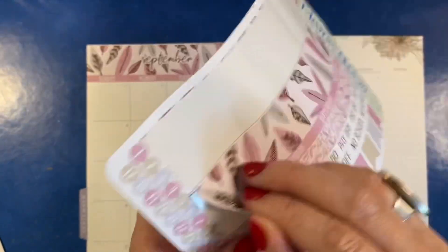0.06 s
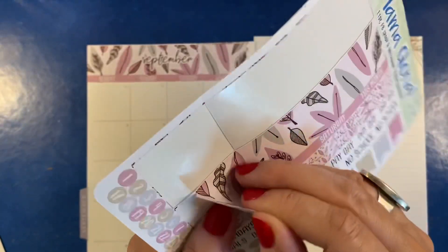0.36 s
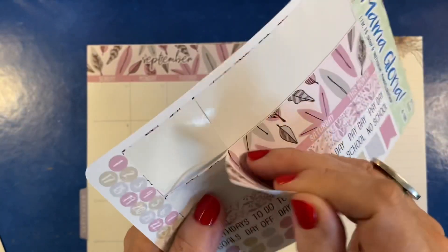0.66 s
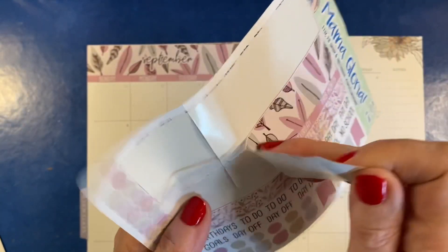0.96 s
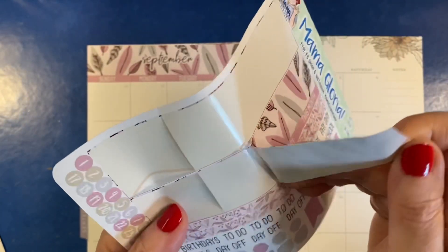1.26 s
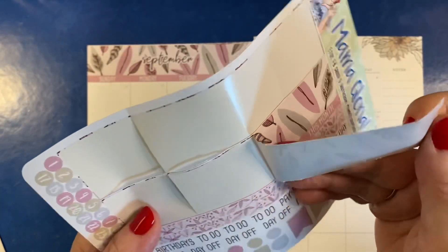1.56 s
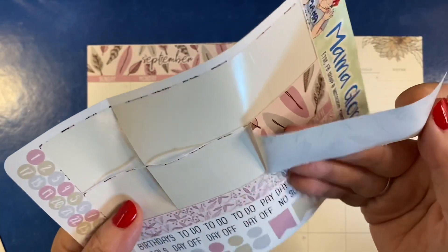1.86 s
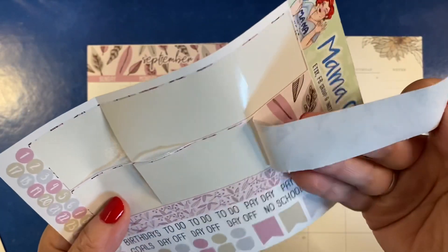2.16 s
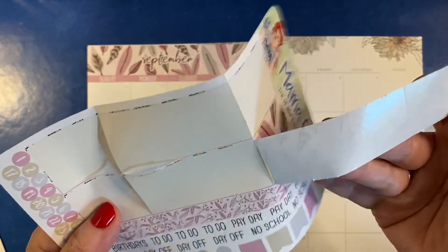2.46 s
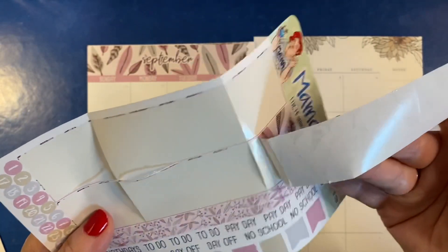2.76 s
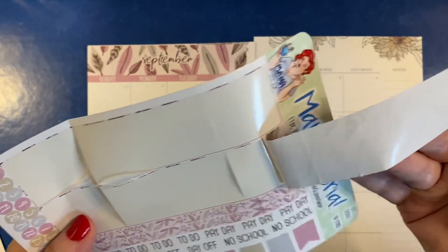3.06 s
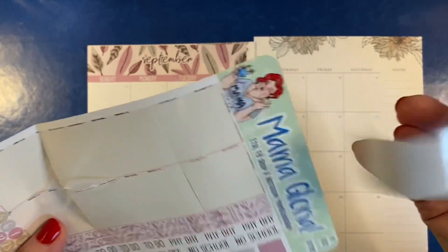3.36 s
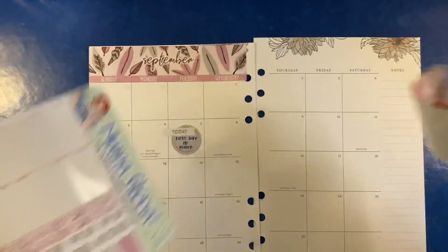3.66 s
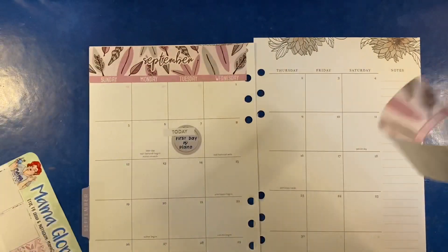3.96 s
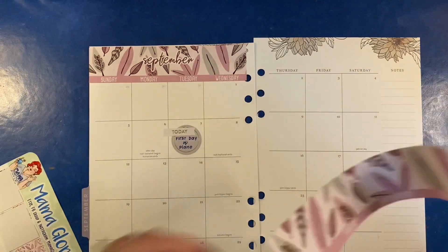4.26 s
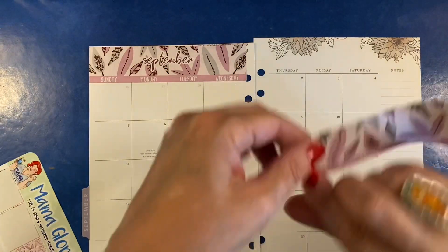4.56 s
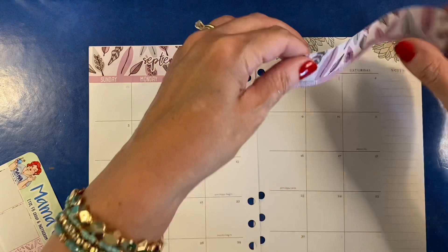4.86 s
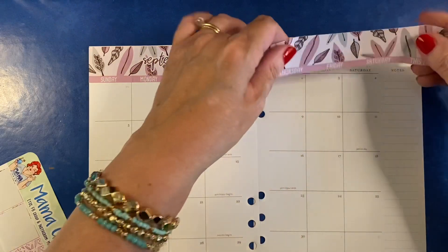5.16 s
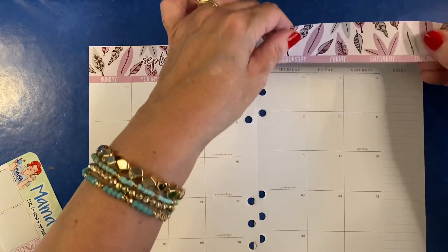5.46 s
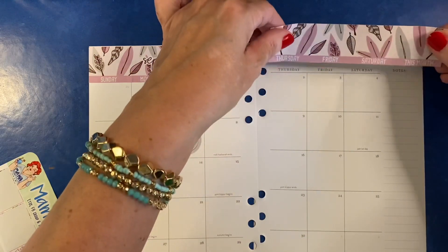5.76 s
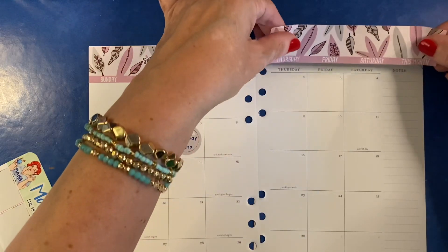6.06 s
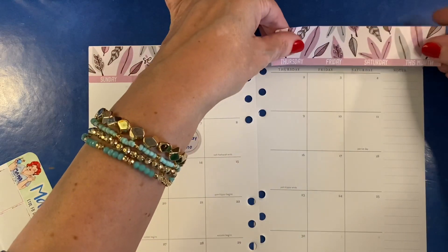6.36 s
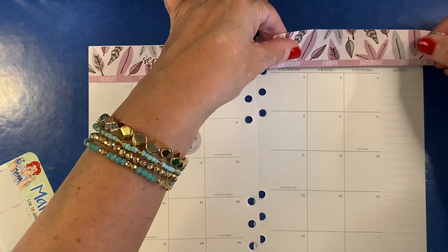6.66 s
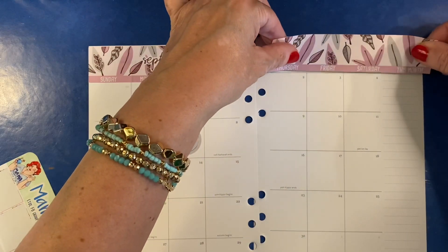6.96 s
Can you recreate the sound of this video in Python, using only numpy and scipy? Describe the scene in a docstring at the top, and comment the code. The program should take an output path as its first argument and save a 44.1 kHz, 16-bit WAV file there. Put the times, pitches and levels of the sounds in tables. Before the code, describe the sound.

Close, crackly peeling and buckling paper give way to a sliding hiss, light ticks and one click over a low room hum.

```python
"""A long sticker is peeled off its glossy backing sheet, close to a two-port microphone.
Threads of glue break in a crackle, and the sheet buckles with snaps and soft thumps.
The sheet slides away with a hiss; fingers stretch the strip over a planner page and tack it down
with a few ticks and one sharp click. A low hum fills the small room, and near the end something
knocks softly on the desk."""
import sys
import numpy as np
from scipy import signal
from scipy.fft import rfft, irfft
from scipy.io import wavfile
from scipy.ndimage import uniform_filter1d

SR = 44100
rng = np.random.default_rng(int(sys.argv[2]) if len(sys.argv) > 2 else 0)


def wav_out(sig):
    """Save sig, one row per channel (or a flat mono array), as 16-bit PCM at SR to the path in sys.argv[1]."""
    wavfile.write(sys.argv[1], SR, np.round(np.clip(np.atleast_2d(sig).T, -1, 1) * 32767).astype(np.int16))


N = 308700  # 7 seconds


def amp(db):
    """Turns decibels into a gain."""
    return 10 ** (np.asarray(db) / 20)


def unit(x):
    """Scales a signal to an average strength (rms) of 1."""
    return x / np.sqrt(np.mean(x ** 2) + 1e-20)


def read(points, hz):
    """Looks up a table by frequency, on a logarithmic axis."""
    f, value = np.transpose(points)
    return np.interp(np.log(hz + 1), np.log(f + 1), value)


def add(mix, s, sound):
    """Adds a sound to the mix at s seconds."""
    part = mix[:, max(round(s * SR), 0):][:, :sound.shape[1]]
    part += sound[:, :part.shape[1]]


def drift(hz):
    """A smooth random wobble, with up to about hz turns a second."""
    f = np.fft.rfftfreq(N, 1 / SR)
    return unit(irfft(rfft(rng.standard_normal(N)) * np.exp(-(f / hz) ** 2), N))


def follow(rows, column):
    """Joins one dB column into a gain over time that fades out beyond both ends."""
    s, db = np.transpose(rows)[[0, column]]
    return amp(np.interp(np.arange(N) / SR, np.r_[s[0] - .04, s, s[-1] + .04], np.r_[-120, db, -120]))


def swells(rows, column, peak_share=.42):
    """Gain over time for hand movements: each speeds up, then eases off."""
    gain = np.zeros((1, N))
    for row in rows:
        start, length = row[:2]
        progress = np.interp(np.linspace(0, 1, int(length * SR)), [0, peak_share, 1], [0, .5, 1])
        add(gain, start, amp(row[column]) * np.sin(np.pi * progress)[None])
    return gain[0]


# where the hands are: t/s, place (1 = left with the sheet, below 0 = right over the page)
HAND_PATH = [(0, 1.2), (.8, 1.1), (2.2, .4), (3.2, .4), (3.6, 1.5), (4.3, -.7), (7, -.6)]
def place(s):
    """How far to the left the hands are at s seconds."""
    return np.interp(s, *np.transpose(HAND_PATH))


# how alike the microphone's two openings (ports) sound: f/Hz, likeness (1 = the same)
PORT_LIKENESS = [(50, 0.87), (300, 0.78), (1000, 0.67), (2500, 0.55), (4500, 0.4), (7000, 0.2),
                 (9000, 0.94), (16000, 1)]
# how much earlier the right port hears: f/Hz, lead/s
RIGHT_LEAD = [(500, -.00004), (3500, -.00003), (5000, .00001), (7000, .00005), (8200, .000178),
              (16000, .000186)]
# the left port's head start for a sound at place 1: f/Hz, phase/rad
LEFT_LEAD = [(100, .1), (450, .3), (1000, .5), (2000, .8), (3500, 1), (5500, 0)]
PAN_DB = 1.6  # left minus right at place 1
def ports(pair, colour=None, left=0):
    """Two sounds become left and right: partly alike, earlier and louder on the nearer side."""
    size = pair.shape[1]
    hz, (a, b) = np.fft.rfftfreq(size, 1 / SR), rfft(pair)
    same = np.clip(read(PORT_LIKENESS, hz), 0, 1)
    shared, apart = a * np.sqrt((1 + same) / 2), b * np.sqrt((1 - same) / 2)
    phase = np.pi * hz * read(RIGHT_LEAD, hz) - left * read(LEFT_LEAD, hz) / 2
    turn = np.exp(1j * phase) * amp(-left * PAN_DB / 2)
    spectrum = np.array([(shared + apart) / turn, (shared - apart) * turn])
    return irfft(spectrum * (1 if colour is None else amp(read(colour, hz))), size)


# the tones of the hum: f/Hz, level/dB, wander/Hz
HUM_TONES = [(59.02, -52.5, 1.213), (127, -67.5, 3)]
# the colour (how strong each frequency is) of the room's noise: f/Hz, level/dB
AIR_COLOUR = [(20, -21), (35, -9.5), (55, 4), (85, 0), (130, -2.5), (200, -7.5), (300, -17.5), (500, -25.5),
              (1000, -34.5), (3000, -51), (7000, -55.5), (16000, -53.5)]
def room_tone(air_db=-59):
    """A wavering low hum in soft, dull noise."""
    hum = 0
    for hz, db, wander in HUM_TONES:
        tone = np.sin(2 * np.pi * np.cumsum(hz + wander * drift(6)) / SR)
        hum += amp(db) * unit(tone * (1 + .049 * drift(7.6)))
    air = unit(ports(rng.standard_normal((2, N)), AIR_COLOUR))
    return hum * amp([[-.6], [.6]]) + amp(air_db) * air


def crackle(per_s, spread_db, life_s, smooth):
    """Tiny bursts of uneven size over a smooth hiss."""
    sizes = amp(spread_db * np.minimum(rng.exponential(1, N), 4))
    clicks = sizes * (rng.random(N) < per_s / SR)
    power = signal.lfilter([1], [1, -np.exp(-2 / (life_s * SR))], clicks ** 2)
    return np.sqrt(power / power.mean() + smooth) * rng.standard_normal((2, N))


def flex(pair, depth_db=3, size=512):
    """As the sheet bends, its resonances wander and colour the sound in passing patches."""
    spectra = signal.stft(pair, nperseg=size)[2]
    patches = uniform_filter1d(rng.standard_normal(spectra.shape[1:]), size=5, axis=0)
    patches = unit(uniform_filter1d(patches, size=9, axis=1))
    return signal.istft(spectra * amp(depth_db * patches), nperseg=size)[1][:, :N]


# the steady pull on the sticker: t/s, glue level/dB, sheet level/dB
STEADY_PULL = [(0, -62, -55.5), (.4, -64, -58), (.62, -60, -57), (.95, -60, -62), (1.08, -61.5, -67),
               (1.35, -59, -63), (1.45, -62.5, -66.5), (2.05, -62, -68), (2.23, -75, -69), (2.35, -66, -61),
               (2.48, -65, -71), (2.75, -64, -63), (3.1, -64, -69), (3.3, -76, -73)]
# tugs, in which it comes away faster: t/s, length/s, level/dB
QUICK_TUGS = [(.48, .1, -59), (.84, .1, -57), (1.12, .16, -51), (1.55, .09, -58), (1.72, .14, -57),
              (2.04, .1, -56), (2.81, .19, -54), (3.14, .08, -57)]
# colours of the breaking glue and the shaken sheet: f/Hz, level/dB
GLUE_COLOUR = [(800, -21), (2500, -10), (3500, 3), (4200, -4.5), (5200, 2), (6400, 0.5), (8500, 7),
               (12000, 3.5), (15500, 0.5), (17000, -8)]
SHEET_COLOUR = [(100, 9), (250, 1), (700, 8.5), (1200, -6.5), (2000, 3), (3500, -4), (6000, -14.5),
                (12000, -16)]
def peel(glue_trim_db=1, sheet_trim_db=-1, tug_shake_db=-4):
    """Threads of glue break in quick clumps and shake the backing sheet; tugs add to the pull."""
    breaks = flex(crackle(per_s=620, spread_db=4.4, life_s=.0006, smooth=.3) * amp(2.3 * drift(45)))
    tugs = swells(QUICK_TUGS, 2)
    pull = follow(STEADY_PULL, 1) + tugs
    shake = follow(STEADY_PULL, 2) + tugs * amp(tug_shake_db)
    glue = unit(ports(breaks, GLUE_COLOUR, left=.6)) * pull * amp(glue_trim_db)
    sheet = unit(ports(breaks, SHEET_COLOUR, left=.6)) * shake * amp(sheet_trim_db)
    return glue + sheet + ticks(pull, 0, STEADY_PULL[-1][0])


def ticks(effort, start, end, per_s=9, offset_db=-.5, spread_db=3):
    """Now and then a thread of glue or a fibre snaps, louder the harder the pull or rub."""
    out, draws = np.zeros((2, N)), rng.random((100, 2))
    for when, strength in draws[:int(per_s * (end - start))]:
        s = start + when * (end - start)
        level_db = 20 * np.log10(effort[int(s * SR)] + 1e-9) + offset_db + spread_db * (2 * strength - 1)
        add(out, s, snap(level_db, body_db=-8, crack_db=4, ring=.002, left=place(s)))
    return out


def ripple(hz, depth_db=3.8):
    """A bent sheet favours some frequencies: a gain with random hills and valleys."""
    lag, phase = rng.random((2, 10, 1))
    waves = np.cos(2 * np.pi * (hz * (.2485 + lag) / 1101 + phase))
    return amp(depth_db * unit(waves.sum(0)))


SHEET_HZ, SHEET_DB, PITCH_SCATTER = 720, 5, .13  # the sheet's main ring; bending shifts its pitch
def snap(level_db, body_db, crack_db, ring, left, size=2048, count=14):
    """A kink flips through the sheet: many bands ring at once, and the high ones die first."""
    hz = np.fft.rfftfreq(size, 1 / SR)
    t = np.maximum(np.arange(size) - 32, 0) / SR
    colour = [(120, body_db - 3), (370, body_db + 3.5), (1050, body_db + 5),
              (3300, .3), (9500, crack_db + .8), (16000, crack_db - 6.5)]
    centres = np.geomspace(140, 15000, count)
    bands = np.array([read(np.c_[centres, row], hz) for row in np.eye(count)])
    ring_hz = SHEET_HZ * np.exp(PITCH_SCATTER * rng.standard_normal())
    bump = amp(SHEET_DB * np.exp(-(np.log((hz + 1) / ring_hz) / .16) ** 2))
    uneven = bump * ripple(hz)
    noise = irfft(rfft(rng.standard_normal((2, 1, size))) * np.sqrt(bands) * uneven, size)
    life = ring * .73 * (centres[:, None] / 3000) ** -.45
    rise = 1 - np.exp(-t / (.4 / centres[:, None] + .14 * ring))  # a slow buckle also starts slowly
    flutter = .07 * np.exp(-t / .0094)  # the sheet moves on weakly after the flip
    ringing = noise * rise * (np.exp(-t / life) + flutter)
    energy = (bands * (amp(level_db + read(colour, hz)) * bump) ** 2).sum(1)
    band_gain = np.sqrt(energy / (ringing ** 2).sum(2))
    return ports((ringing * band_gain[..., None]).sum(1), left=left)


# the paper buckles: t/s, level/dB, low boost/dB, high boost/dB, ring/s (scaled for each band)
BUCKLES = [(.0532, -66, 21, -7, .002), (.0875, -55, -3, 9, .005), (.098, -55, -15, 2, .0012),
           (.1038, -50, -8, 5, .002), (.139, -47, 6, -13, .0012), (.1571, -46, 7, -6, .0012),
           (.1738, -52, 3, 10, .002), (.188, -59, -3, 8, .002), (.3044, -36.5, 7, -1.5, .0035),
           (.3099, -44, 10, -9, .0025), (.318, -51, 3, 2, .0047), (.4536, -39, 6.5, 9, .0026),
           (.4841, -37, 2, -4, .0033), (.5448, -52, 2, 2, .0023), (.5818, -37, 2, 0, .002),
           (.6701, -47, -2, 4, .003), (.7186, -28.5, -3.5, -18, .0018), (.7282, -44, 4, -13, .002),
           (.7711, -54, 5, 13, .0014), (.823, -42, -2, 5, .004), (.8319, -45, 10, 4, .0033),
           (.8474, -45, 5, 1, .0016), (.9104, -44.5, 6, 1, .0026), (.984, -45.5, -7, -2, .002),
           (1.139, -48, 6, 5, .006), (1.1609, -48, 2, 7, .004), (1.2626, -55, -14, 2, .003),
           (1.3212, -52, -2, 9, .008), (1.4698, -52, 0, 2, .003), (1.5129, -45.5, -3, 2, .004),
           (1.5632, -53, -13, 1, .0016), (1.6226, -54, -9, 6, .0017), (1.7522, -48, 2, 5, .0045),
           (1.8019, -53, -10, 2, .003), (1.92, -56, -12, 5, .0025), (1.9967, -44.5, -12, 6, .0013),
           (2.099, -49, -5, -3, .0027), (2.1203, -48.5, -7, 2, .0034), (2.1266, -43.5, -1, -2, .0033),
           (2.2, -68, 19, -4, .006), (2.2851, -55, 0, -6, .0046), (2.316, -55, 2, -4, .009),
           (2.3982, -53, -1, 6, .002), (2.5478, -44, -6, -5, .0018), (2.6169, -65, 20, -9, .003),
           (2.6913, -45, -18, -1, .0027), (2.8418, -48, -5, 4, .0065), (2.8522, -43, 0, -5, .0021),
           (2.9164, -52, -6, 1, .003), (2.9285, -53, -1, -2, .006), (2.971, -50, -10, -1, .002),
           (3.0316, -56, -4, 9, .003), (3.1028, -48.5, 0, 0, .0028), (3.1196, -45, -14, -8, .012),
           (3.1325, -44.5, 3, -2, .005), (3.1403, -42, -4, -7, .0027), (3.1843, -46, -2, 3, .006),
           (3.21, -57, 2, 11, .005), (3.2603, -55, -8, -5, .003), (3.402, -55, -4, -5, .004),
           (3.4463, -47, -17, -12, .006), (3.6908, -50, -4, -11, .006), (3.834, -48, -20, -8, .002),
           (4.064, -68, -12, 8, .003), (4.1112, -62, -10, -1, .007), (4.1668, -59, -17, -11, .005),
           (4.215, -58, -10, -4, .015), (4.3302, -59, -15, 3, .011), (4.3902, -58, -3, 6, .01),
           (4.4081, -51, -9, 8, .003), (4.475, -59, -3, -9, .0037), (4.5232, -55, -3, 4, .0034),
           (4.5498, -53, -10, 3, .012), (4.765, -53, -2, 3, .0037), (4.7919, -59, 1, 3, .003),
           (5.0356, -46, -10, 5, .0037), (5.044, -57, 2, 7, .004), (5.3058, -52, -4, 3, .001),
           (5.4272, -41.5, -5, -4, .0036), (5.7417, -50, -11, 1, .0027), (6.2193, -48, -10, 0, .0027),
           (6.5676, -60, -10, 10, .005), (6.5842, -32, -5, 1, .002)]
def buckles(strain_db=-11.5, build_s=.0035, size=1024):
    """Sheet and sticker buckle and snap; fibres fizz briefly as the strain builds before each."""
    out = np.zeros((2, N))
    swell = np.exp(-np.arange(size)[::-1] / (build_s * SR))
    for s, level_db, *shape in BUCKLES:
        add(out, s - .0006, snap(level_db, *shape, place(s)))
        strain = unit(ports(rng.standard_normal((2, size)), FIBRE_COLOUR)) * swell
        add(out, s - size / SR, strain * amp(level_db + strain_db))
    return out


def blow(s, level_db, tones):
    """A struck object rings with a few tones; each drops 60 dB in its fade time."""
    t, out = np.arange(SR // 2) / SR, np.zeros((2, N))
    ring = sum((-1) ** k * amp(db) * np.exp(-np.log(1000) * t / fade_s) * np.sin(2 * np.pi * hz * t)
               for k, (hz, db, fade_s) in enumerate(tones))
    add(out, s, amp(level_db) * np.array([ring, ring]) * (1 - np.exp(-t / .0007)))
    return out


# the sheet's thumps: t/s, level/dB
THUMPS = [(.158, -45), (.309, -35), (.456, -39), (.832, -41), (1.161, -47), (1.513, -42), (1.646, -48),
          (1.752, -44), (2.2, -44), (2.285, -52), (2.617, -47), (2.89, -52), (3.103, -48), (3.135, -47),
          (3.185, -44), (3.21, -51), (5.428, -53)]
# its low tones before bending shifts them: f/Hz, level/dB, fade/s
THUMP_TONES = [(122, -3, .1), (175, -6, .06), (300, 0, .045), (400, -3, .035), (660, -7, .03)]
def thumps():
    """The flexing sheet thumps softly, at a slightly different pitch each time."""
    bends = np.exp(PITCH_SCATTER * rng.standard_normal(len(THUMPS)))
    return sum(blow(s, db, np.array(THUMP_TONES) * [bend, 1, 1]) for (s, db), bend in zip(THUMPS, bends))


# strokes of a paper edge or fingertip: start t/s, end t/s, level/dB, start f/Hz, end f/Hz
EDGE_STROKES = [(2.76, 2.887, -56.5, 3180, 2700), (2.898, 2.946, -54, 1650, 1550),
                (3.252, 3.582, -65, 850, 1300), (3.312, 3.43, -69, 1900, 2300),
                (3.482, 3.722, -56.5, 3030, 4650), (3.78, 3.857, -65, 3000, 3100),
                (3.94, 4.05, -74, 2100, 2100), (4.467, 4.564, -63, 2200, 2900),
                (4.58, 4.615, -57, 2700, 3100), (4.867, 5.018, -59, 5000, 4700),
                (5.2, 5.33, -69, 3400, 3400), (5.477, 5.558, -66, 4400, 4200), (5.6, 5.98, -72, 4250, 4250),
                (6.25, 6.495, -75, 4380, 4220), (6.922, 6.991, -75, 4400, 4600)]
def strokes(width_share=.46):
    """Tiny slips make the free length of paper ring; its pitch glides as the contact moves."""
    out, slips = np.zeros((2, N)), crackle(per_s=700, spread_db=3.5, life_s=.0008, smooth=.6)
    for start, end, db, start_hz, end_hz in EDGE_STROKES:
        drive = slips[:, int(start * SR):int(end * SR)]
        size = drive.shape[1]
        width_hz = width_share * (start_hz + end_hz) / 2
        decay = np.exp(-np.pi * width_hz / SR)
        glide = np.exp(2j * np.pi * np.cumsum(np.linspace(start_hz, end_hz, size)) / SR)
        # shift down, smooth, shift back: this keeps a band around the gliding pitch
        swish = (glide * signal.lfilter([1], np.poly([decay, decay]), drive / glide)).real
        add(out, start, amp(db) * unit(ports(swish, left=place(start))) * np.sqrt(np.hanning(size)))
    return out


# paper rubs on paper or skin: t/s, length/s, hiss level/dB, page level/dB
PAPER_RUBS = [(3.39, .53, -63, -60), (4.2, .08, -67, -73), (4.38, .1, -55, -71), (4.48, .14, -55.5, -64),
              (4.75, .07, -62, -65), (4.87, .22, -57, -66.5), (5.19, .14, -61.5, -72),
              (5.38, .07, -61, -62), (5.48, .09, -63.5, -68), (5.84, .11, -64.5, -72),
              (6.06, .23, -67, -82), (6.52, .1, -65, -78), (6.62, .16, -75, -71)]
# colours of the hissing fibres and of the page: f/Hz, level/dB
FIBRE_COLOUR = [(1000, -23.5), (2800, -5.5), (4500, -3.5), (6500, -2), (8500, 0.5), (11000, -1),
                (15500, -4.5), (17000, -13.5)]
PAGE_COLOUR = [(150, -6.5), (400, -2), (900, -0.5), (1600, -2.5), (2600, -0.5), (4000, -5.5), (6000, -15.5),
               (10000, -35.5)]
def slide(start=3.3, end=6.6, hiss_trim_db=.1, page_trim_db=-3):
    """Fibres catch and slip as paper slides, making a fine, soft hiss."""
    slips = flex(crackle(per_s=1500, spread_db=2.2, life_s=.0007, smooth=.8) * amp(1.7 * drift(35)))
    stir = [(s, -80.5, -79) for s in (start, end)]  # fingers faintly stir the strip between rubs
    effort = swells(PAPER_RUBS, 2) + follow(stir, 1)
    shake = swells(PAPER_RUBS, 3) + follow(stir, 2)
    hiss = unit(ports(slips, FIBRE_COLOUR)) * effort * amp(hiss_trim_db)
    page = unit(ports(slips, PAGE_COLOUR)) * shake * amp(page_trim_db)
    pan_db = PAN_DB * place(np.arange(N) / SR)
    return (hiss + page) * amp([pan_db / 2, -pan_db / 2]) + ticks(effort, start, end)


# the tones of the page: f/Hz, level/dB, fade/s
PAGE_TONES = [(345, -8, 0.07), (995, -1.5, 0.03), (1400, -4, .02), (1670, 0, .028), (2020, -1.5, .024),
              (2280, -7, .03)]
def page_click():
    """Tacking the strip down sets the page ringing with one sharp click."""
    return blow(s=6.585, level_db=-30.5, tones=PAGE_TONES)


# the tones of the desk: f/Hz, level/dB, fade/s
DESK_TONES = [(168.6, -2, .09), (263, -1.5, .08), (379, -5, 0.19), (501, -21, 0.2), (760.4, -3, 0.045),
              (1126, -2, 0.05), (1572, -28, .08), (2400, -26, 0.05)]
def desk_knock():
    """A soft knock makes the desk ring briefly."""
    return blow(s=6.745, level_db=-42, tones=DESK_TONES)


# how long the echo takes to drop 60 dB: f/Hz, fade/s
ECHO_FADE = [(200, 1.3), (1000, 0.5), (3000, 0.32), (6000, 0.29), (10000, 0.14), (16000, 0.1)]
# the echo's strength: f/Hz, level/dB
ECHO_COLOUR = [(200, -18), (700, -14), (2000, -13), (6000, -11), (9000, -18), (16000, -31)]
# sound reaching the room, less while the sheet is held close: t/s, level/dB
ECHO_FEED = [(0, -3), (1, -2.5), (3.2, -1), (4.4, 0), (7, .5)]
def room_echo(near, first_echo_s=.0047):
    """The room answers with a wash of echoes, each band dying at its own speed."""
    hz, t, noise = signal.stft(ports(rng.standard_normal((2, SR // 2))), SR, nperseg=256)
    onset = np.clip(t / first_echo_s - 1, 0, 1)
    fade = np.exp(-np.log(1000) * t / read(ECHO_FADE, hz)[:, None]) * onset
    fade *= amp(read(ECHO_COLOUR, hz))[:, None] / np.sqrt((fade ** 2).mean(1, keepdims=True) * SR / 2)
    tail = signal.istft(noise * fade, SR, nperseg=256)[1]
    return signal.fftconvolve(near[:1] * follow(ECHO_FEED, 1), tail, axes=1)[:, :N]


def scene():
    """Paper and desk, their echo and the room's hum."""
    steady = room_tone()
    near = buckles() + slide() + strokes() + page_click() + desk_knock() + peel() + thumps()
    return near + room_echo(near) + steady


def record(dry):
    """Cuts the highest treble, above 16500 Hz."""
    lowpass = signal.firwin(255, 16500, window=("kaiser", 9), fs=SR)
    return signal.oaconvolve(dry, lowpass[None], "same")


dry = scene()
out = record(dry)
wav_out(out)
```